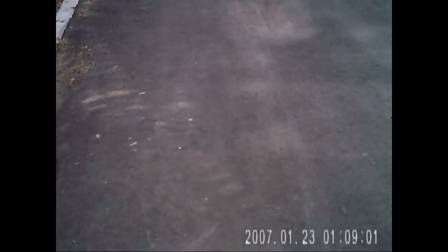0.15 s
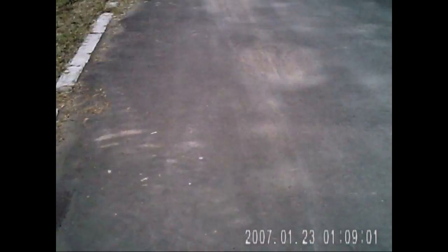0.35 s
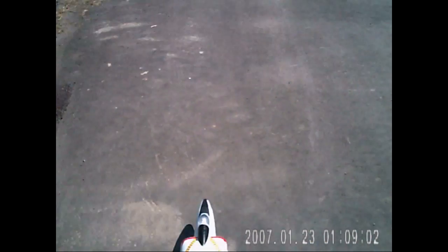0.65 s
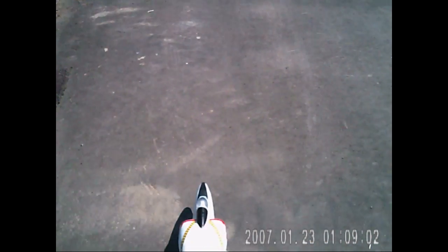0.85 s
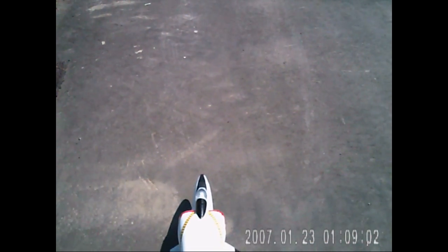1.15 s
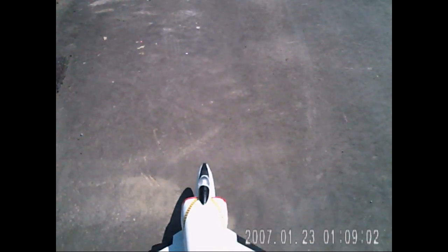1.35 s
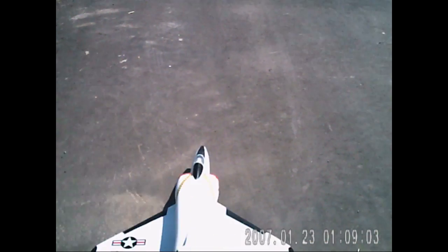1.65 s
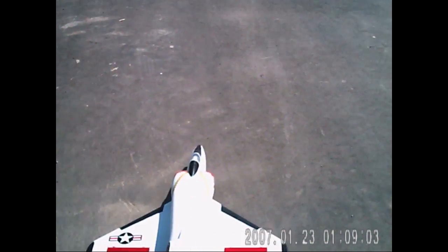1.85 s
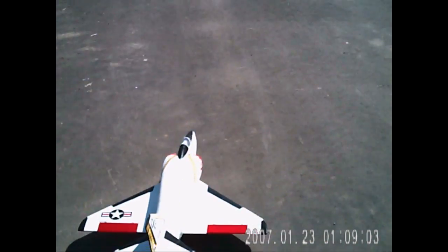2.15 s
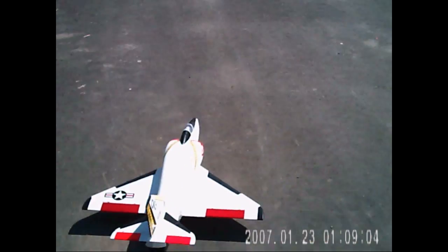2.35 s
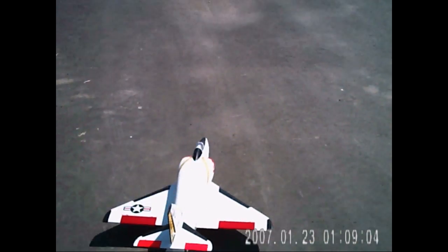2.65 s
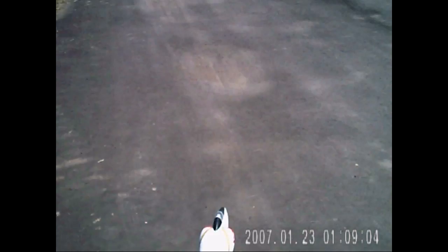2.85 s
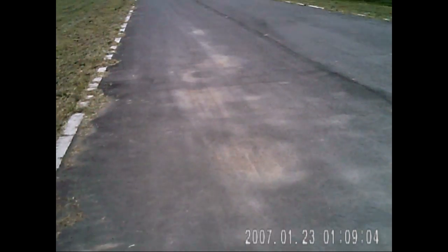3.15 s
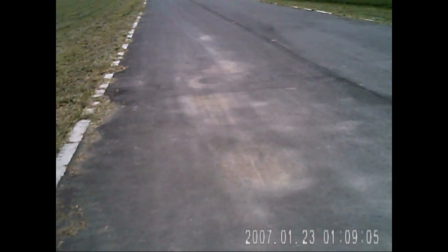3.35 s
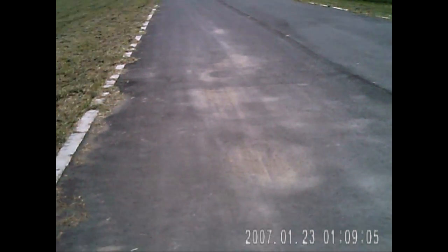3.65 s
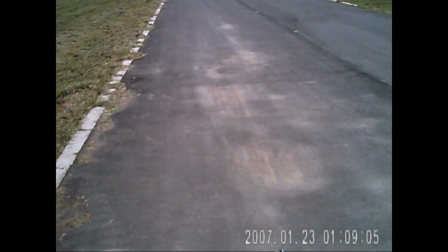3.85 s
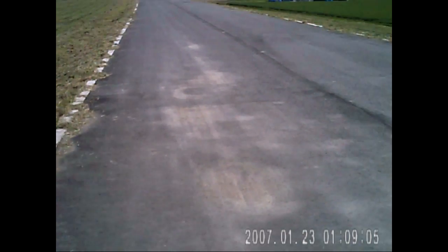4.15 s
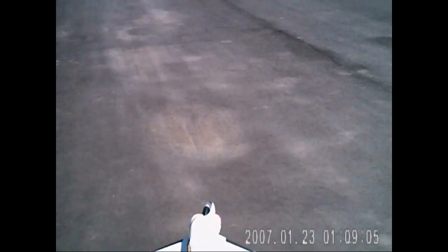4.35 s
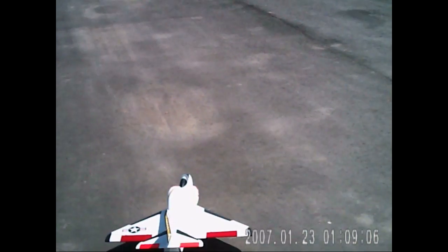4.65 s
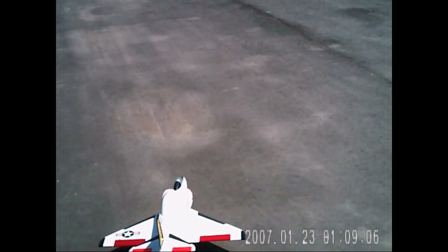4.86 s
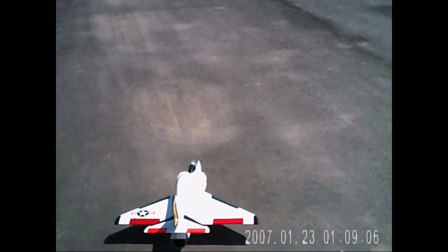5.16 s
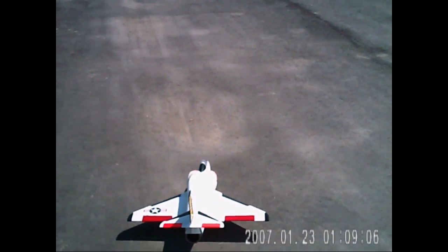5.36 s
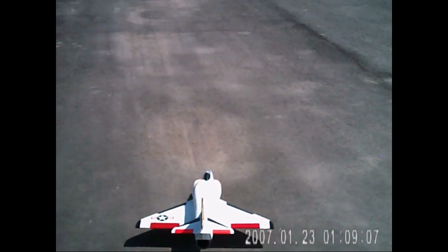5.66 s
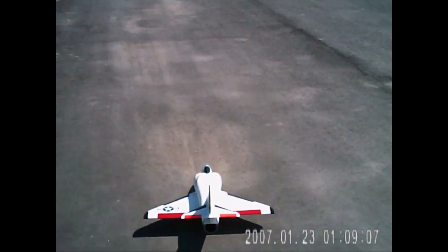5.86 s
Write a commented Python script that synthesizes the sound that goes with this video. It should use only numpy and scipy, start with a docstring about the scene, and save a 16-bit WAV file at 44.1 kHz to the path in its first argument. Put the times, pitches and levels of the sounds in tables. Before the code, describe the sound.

At first there is only a faint hiss and a thin, steady electronic whistle. At about 0.5 seconds a model jet's electric motor starts with a quick clatter of small knocks, and its fan begins to hum. Between 1.1 and 1.4 seconds it climbs to a buzzing whine with rushing air, wavers, and reaches its highest pitch near 2 seconds. From about 2.5 to 3.6 seconds it holds a slightly lower, rough, stuttering buzz as the jet taxis ahead. The fan then winds down to a soft hum around 4.1 seconds and revs back up by 4.5. It dips briefly near 5.5 seconds and rises again toward 6. From about 3.3 seconds, irregular gusts of wind flutter and thump on the microphone. The sound is close and outdoors, with a tinny edge from the small microphone.

```python
"""A model jet's fan runs up and throttles back as the jet taxis on asphalt, close to a tiny camera.
The motor clatters into motion, then buzzes once a turn, so its partials are multiples (orders) of the
shaft speed: a soft hum at idle, a clean whine at high speed, a stutter on alternate turns in between.
Turbulent air rushes through the fan and gusts flutter on the microphone.
The camera's electronics add hiss and a thin whistle, and its 8 kHz sampling gives a tinny edge."""
import sys
import numpy as np
from scipy import signal
from scipy.fft import rfft, irfft
from scipy.io import wavfile
from scipy.ndimage import uniform_filter1d, map_coordinates

SR = 44100
rng = np.random.default_rng(int(sys.argv[2]) if len(sys.argv) > 2 else 0)


def materialize(psi):
    """Save the field psi as 16-bit PCM at rate SR to the path in sys.argv[1].

    A 1-D psi becomes a single channel; in a 2-D psi each row is a channel.
    """
    bounded = np.clip(np.atleast_2d(psi).T, -1, 1)
    quanta = np.round(bounded * 32767).astype(np.int16)
    wavfile.write(sys.argv[1], SR, quanta)


N = 264159
T = np.arange(N) / SR

# Speed asked for by the throttle. Each row: time in seconds, shaft speed in Hz.
THROTTLE = [(0.557, 136.7), (0.721, 167.1), (1.11, 155.5), (1.224, 192.4), (1.294, 235.3), (1.429, 265.8),
            (1.6, 244.1), (1.776, 270), (1.967, 275.5), (2.183, 242.7), (2.551, 224.6), (2.845, 220.9),
            (3.262, 221), (3.407, 225.6), (3.625, 220.2), (4.009, 131.4), (4.19, 107.3), (4.395, 198),
            (4.578, 222.9), (4.905, 213.4), (5.139, 217.8), (5.286, 220), (5.491, 190), (5.676, 237.4),
            (5.998, 271.5)]
# Shaft harmonics. Each row: order, then relative level in dB at high speed, stuttering and idling.
SHAFT_ORDERS = [(1, 4.5, 6.5, -6.5), (2, 4.5, 5, -6.5), (3, 9, 5.5, -2.5), (4, -2.5, 7.5, -10.5),
                (5, 6, 9.5, -1), (6, 3.5, 7.5, -4.5), (7, 3, -1.5, -1.5), (8, 5.5, 2.5, -2.5),
                (9, -12, 2, -17), (10, 7.5, 5, -4.5), (11, -4.5, 2.5, -14), (12, -2, 2, -9),
                (13, -15, -13, -7), (15, 4.5, -1, 0.5)]
# Half orders that stand out from behind. Each row: order, boost in dB.
HALF_ORDER_PEAKS = [(2.5, 7), (3.5, 3)]
# Response of duct and airframe. Each row: frequency in Hz, gain in dB from beside and from behind.
BODY_RESPONSE = [(150, -12, -3.5), (269, 6.5, 0), (346, -11.5, -5.5), (543, 6, 3), (717, 0, 1.5),
                 (860, -4, -6.5), (1025, -2, 0.5), (1244, 2, 1), (1217, 6, 1.5), (1522, -6, -4),
                 (1670, -4, -12), (2100, -6, -6.5), (2250, -5, -5.5), (2910, -9.5, -11), (3120, -22, -20),
                 (4000, -19, -22)]
# Balance as the jet rolls from beside the camera to ahead of it. Each row: time in seconds, share heard
# from behind (0-1), then gain in dB of low orders, high orders, the rush and the rush's lower band.
DIRECTIVITY = [(1.0, 0, -1, 11, 1, -1.5), (1.36, 0.06, 0, -1, -1, -1.5), (1.52, 0, -2.5, -2.5, -0.5, 3),
               (2.1, 0.2, -1, 2, 1, -3), (2.45, 0.04, -3.5, -5.5, 0, 0.5), (3.0, 0.51, -5, -4, 2, 0.5),
               (3.5, 0.98, -7, -2, -2, 2.5), (4.1, 0.84, -6, -2, 0, -0.5), (4.6, 1, -9, -1.5, -2, 1.5),
               (5.35, 1, -9, -4.5, 0.5, -0.5), (5.85, 0.97, -7.5, -1.5, 1.5, -5.5)]
# Spectrum of the rush. Each row: frequency in Hz, relative density in dB from beside and from behind.
RUSH_SPECTRUM = [(103, -30.5, -8.5), (335, -8, -12), (496, -2.5, -8), (680, -1.5, 0.5), (1060, 0.5, 0),
                 (1180, 8, 3.5), (1210, 1.5, 6), (1490, 4, -2.5), (1680, 0.5, -6), (2050, 3, 4.5),
                 (2470, 3, 3), (2750, -1, -2.5), (3130, -6, -7.5), (3740, 1.5, -2)]
# Knocks of the starting motor. Each row: start in seconds, level in dB, decay in seconds, brightness 0-1.
START_KNOCKS = [(0.472, -26, 0.0096, 0.8), (0.48, -26, 0.0068, 0.6), (0.493, -28.5, 0.027, 0),
                (0.516, -30, 0.02, 0.7), (0.547, -34, .04, 1), (0.623, -26.5, 0.0083, .7),
                (0.642, -33, 0.0063, .3), (.659, -29, 0.05, 0.7)]
# Resonances rung by the knocks. Each row: frequency in Hz, bandwidth in Hz, relative gain in dB.
AIRFRAME_MODES = [(563, 73, -17), (783, 160, 0), (1110, 180, -5), (1580, 260, -5.5), (2200, 82, -1.5),
                  (2720, 260, -17.5)]
# Gusts on the microphone. Each row: peak time in seconds, peak level in dB, half-length in seconds.
WIND_GUSTS = [(2.003, -51, 0.18), (3.4, -41, 0.17), (3.516, -31, 0.044), (3.64, -38, 0.051),
              (3.88, -43, 0.048), (3.979, -33.5, 0.013), (4.082, -35.5, 0.046), (4.271, -36, 0.042),
              (4.431, -36, 0.11), (4.571, -27.5, 0.02), (4.74, -35.5, 0.13), (4.959, -33, 0.062),
              (5.09, -32, 0.068), (5.546, -36, 0.036), (5.66, -28.5, .04)]
# Spectrum of the gusts. Each row: frequency in Hz, relative density in dB.
WIND_SPECTRUM = [(15, -4), (40, 6), (110, 4.5), (220, 1.5), (350, -2), (600, -12), (1200, -35),
                 (3900, -17.5)]
# Steady electronic tones. Each row: frequency in Hz, level in dB.
WHISTLE_TONES = [(769.8, -47.5), (1001, -85)]
# Spectrum of the microphone hiss. Each row: frequency in Hz, relative density in dB.
HISS_SPECTRUM = [(40, 14.5), (300, -1.5), (900, 5), (1500, 2), (2400, 3), (3200, 2), (3950, 3)]

CRUISE_HZ = 245  # reference shaft speed for the levels of buzz and rush
CHATTER_HZ, CHATTER_WIDTH_HZ = 170.2, 5  # the rotor chatters above this speed, runs smoothly below
STUTTER_HZ, STUTTER_HALF_WIDTH_HZ = 207.4, 34.9  # speed range in which alternate turns differ
CLOCK_HZ = 8000  # the converter's sampling rate


def fan(inertia_s=0.07, start_s=0.554, rise_s=0.091, tremble=0.001966):
    """Rotational inertia smooths the speed of the one shaft that drives both buzz and rush."""
    span = int(inertia_s * SR)
    asked_hz = curves(THROTTLE)[0]
    hz = uniform_filter1d(uniform_filter1d(asked_hz, size=span), size=span)
    accel_hz_per_s = np.gradient(hz) * SR
    phase = 2 * np.pi * np.cumsum(hz * (1 + tremble * walk(50))) / SR
    buzz_db, stutter_db, torque = motor_load(hz, accel_hz_per_s)
    tones = buzz(hz, phase, buzz_db, stutter_db, torque) + stutter(hz, phase, buzz_db + stutter_db)
    running = np.clip((T - start_s) / rise_s, 0, 1)
    return running * (tones + rush(hz, phase, accel_hz_per_s))


def motor_load(hz, accel_hz_per_s, cruise_db=-33, db_per_octave=11.5, full_torque_hz_per_s=440,
               in_range_db=1.5, steady_db=-22, stutter_torque_db=-14.5):
    """Torque goes with acceleration; with speed it sets the buzz level and the stutter relative to it."""
    torque = np.clip(accel_hz_per_s / full_torque_hz_per_s, 0, 1)
    buzz_db = cruise_db + db_per_octave * np.log2(hz / CRUISE_HZ) - 0.5 * torque
    in_range = bell(((hz - STUTTER_HZ) / STUTTER_HALF_WIDTH_HZ) ** 2)
    stutter_db = steady_db + in_range * (in_range_db - steady_db + stutter_torque_db * torque ** 2)
    return buzz_db, stutter_db, torque


def buzz(hz, phase, buzz_db, stutter_db, torque, waver_db=1.71, coast_db_per_octave=8):
    """One pulse a turn makes a harmonic series, which glides through the body's fixed resonances."""
    _, low_db, high_db, _, _ = curves(DIRECTIVITY)
    smooth = 0.5 - 0.5 * np.tanh((hz - CHATTER_HZ) / CHATTER_WIDTH_HZ)
    stuttering = np.clip((stutter_db + 20) / 11, 0, 1)
    high_db = high_db + 21 * np.log(hz / CRUISE_HZ)  # high orders need a fast shaft
    coast_db = coast_db_per_octave * np.log2(hz / CHATTER_HZ)  # the hum fades as the shaft slows
    out = 0
    for order, fast_db, eased_db, idle_db in SHAFT_ORDERS:
        order = round(order)
        chatter_db = fast_db + stuttering * (eased_db - fast_db) + (low_db if order < 8 else high_db)
        db = buzz_db + smooth * (idle_db + coast_db) + (1 - smooth) * chatter_db
        # dispersion in the duct: high orders arrive later than low ones
        angle = order * phase - 1.1 * order ** 1.5 + np.pi
        # turbulent inflow shakes the high orders most, and more so under torque
        shake = (0.18 + 0.11 * stuttering + 0.24 * torque ** 2) * (order / 5) ** 1.3
        wave = (1 + shake * walk(90)) * np.cos(angle) + shake * walk(90) * np.sin(angle)
        wave /= np.sqrt(1 + shake ** 2)
        db += waver_db * np.sqrt(order / 5) * walk(9)
        out += undb(db) * body_gain(order * hz) * wave
    return np.sqrt(2) * out


def stutter(hz, phase, level_db, waver_db=3.0, slip_rad=1.0):
    """Period doubling: when alternate turns differ, half orders rattle between the harmonics."""
    rear_share, low_db, _, _, _ = curves(DIRECTIVITY)
    boost_db = dict(HALF_ORDER_PEAKS)
    out = 0
    for order in np.arange(1, 13) + 0.5:
        tilt_db = -3.5 + 9 * np.log(order / 5)  # sharp, with little bass
        facing_db = low_db + rear_share * boost_db.get(order, 0)
        amplitude = undb(level_db + tilt_db + facing_db + waver_db * walk(13))
        angle = order * phase + rng.uniform(0, 2 * np.pi) + slip_rad * walk(10)
        out += amplitude * body_gain(order * hz) * np.cos(angle)
    return np.sqrt(2) * out


def body_gain(hz):
    """Duct and airframe act as a filter whose response depends on the listening direction."""
    return blend_sides(*(gain_at(hz, side) for side in side_spectra(BODY_RESPONSE)))


def rush(hz, phase, accel_hz_per_s, cruise_db=-29.5, db_per_octave=16, churn_hz_per_s=184,
         pulsing=0.26, split_hz=1600):
    """Turbulence makes broadband noise, a puff a turn; from behind, the tailpipe's ring takes over."""
    _, _, _, facing_db, lower_db = curves(DIRECTIVITY)
    level_db = cruise_db + db_per_octave * np.log2(hz / CRUISE_HZ) + facing_db
    puffs = rng.standard_normal(N) * (1 + pulsing * np.cos(phase)) * undb(-0.45 * walk(120))
    air = blend_sides(*(coloured(puffs, side) for side in side_spectra(RUSH_SPECTRUM)))
    lower = signal.sosfiltfilt(signal.butter(3, split_hz, fs=SR, output="sos"), air)
    upper = air - lower
    # a change of speed churns the air, mostly in the lower band
    churn_db = 3 * np.tanh(np.abs(accel_hz_per_s) / churn_hz_per_s)
    bands = undb(-1.55 + 0.22 * churn_db) * upper + undb(lower_db + churn_db) * lower
    return undb(level_db) * bands / upper.std()


def clatter():
    """Impacts excite the airframe's modes and decay exponentially; harder ones favour the upper modes."""
    out = np.zeros(N)
    for start_s, db, decay_s, brightness in START_KNOCKS:
        noise = coloured(rng.standard_normal(N), [(200, -19), (500, 6.0), (2500, -7.5), (3500, -9)])
        ring = 0
        for hz, width_hz, mode_db in AIRFRAME_MODES:
            mode = signal.lfilter(*signal.iirpeak(hz, hz / width_hz, fs=SR), noise)
            ring += undb(mode_db) * (hz / 750) ** (brightness - 0.5) * mode
        envelope = (T >= start_s) * np.exp(-np.abs(T - start_s) / decay_s)
        out += undb(db) * envelope * ring / ring.std()
    return out


def gusts(breeze_db=-60, flicker_db=0.6):
    """Eddies make the pressure at the microphone port fluctuate; gusts and breeze add in power."""
    gust_power = sum((undb(db) * bell((T - peak_s) / half_s)) ** 2 for peak_s, db, half_s in WIND_GUSTS)
    moving = np.clip((T - 0.45) / 0.15, 0, 1)  # the wind fades in as the jet sets off
    envelope = moving * np.sqrt(undb(breeze_db) ** 2 + gust_power) * undb(flicker_db * walk(30))
    return envelope * coloured(rng.standard_normal(N), WIND_SPECTRUM)


def electronics(hiss_db=-48.5):
    """The camera's self-noise sets a floor of steady whistle and broadband hiss."""
    whistle = sum(np.sqrt(2) * undb(db) * np.sin(2 * np.pi * hz * T) for hz, db in WHISTLE_TONES)
    return whistle + undb(hiss_db) * coloured(rng.standard_normal(N), HISS_SPECTRUM)


def clock_whine(carrier_db=-68.5, modulation_db=-64):
    """Amplitude modulation by the whistle gives the clock tone sidebands in the quiet first half second."""
    quiet = np.clip((0.5 - T) / 0.04, 0, 1)
    whistle = np.sin(2 * np.pi * WHISTLE_TONES[0][0] * T)
    amplitude = undb(carrier_db) + undb(modulation_db) * quiet * whistle
    return np.sqrt(2) * amplitude * np.cos(2 * np.pi * CLOCK_HZ * T)


def side_spectra(table):
    """A directional source has two (Hz, dB) spectra: from beside and from behind."""
    return [np.array(table)[:, [0, column]] for column in (1, 2)]


def blend_sides(beside, behind):
    """Directivity: the rear sound replaces the side sound as the jet rolls ahead."""
    rear_share = np.clip(curves(DIRECTIVITY)[0], 0, 1)
    return (1 - rear_share) * beside + rear_share * behind


def coloured(x, spectrum):
    """Filtering by multiplication in frequency, scaled to rms 1."""
    y = irfft(rfft(x) * gain_at(np.fft.rfftfreq(N, 1 / SR), spectrum), N)
    return y / y.std()


def gain_at(hz, spectrum):
    """Gain of a (Hz, dB) spectrum, band-limited to half the converter's sampling rate."""
    points_hz, db = np.transpose(spectrum)
    return undb(np.interp(np.log(hz + 1e-9), np.log(points_hz), db)) * (hz < CLOCK_HZ / 2)


def curves(table):
    """Linear interpolation in time gives each column one value per sample."""
    times, *columns = np.transpose(table)
    return [np.interp(T, times, column) for column in columns]


def walk(rate):
    """Smooth random fluctuation with a spread near 1, changing about rate times a second."""
    coarse = T[::32]
    drift = map_coordinates(rng.standard_normal(4096), [coarse * rate], order=3, mode="wrap")
    return np.interp(T, coarse, drift)


def bell(x):
    """Gaussian curve: 1 at 0, about a third at 1 either side."""
    return np.exp(-x ** 2)


def undb(db):
    """Decibels to amplitude ratio."""
    return 10 ** (np.asarray(db) / 20)


def scene():
    """Superposition: all sources add in one channel."""
    return (fan() + clatter() + gusts() + electronics())[None]


def record(dry, bias=-0.751, treble_lift=0.14, white_db=-58, top_hz=14700):
    """Spectral imaging: samples joined by straight lines mirror the sound around the clock frequency."""
    ticks = np.arange(0, N / SR, 1 / CLOCK_HZ)
    samples = map_coordinates(dry[0], [ticks * SR], order=3, mode="nearest")
    samples = np.clip(samples + bias, -1, 1) - bias  # the off-centre converter clips the troughs
    joined = np.interp(T, ticks, samples)
    # the output stage lifts the top a little and adds clock whine and white hiss
    treble = signal.sosfiltfilt(signal.butter(2, 6000, "high", fs=SR, output="sos"), joined)
    output = joined + treble_lift * treble + clock_whine() + undb(white_db) * rng.standard_normal(N)
    lowpass = signal.ellip(10, 0.2, 80, top_hz, fs=SR, output="sos")
    return bias + signal.sosfilt(lowpass, output)[None]


dry = scene()
out = record(dry)
materialize(out)
```